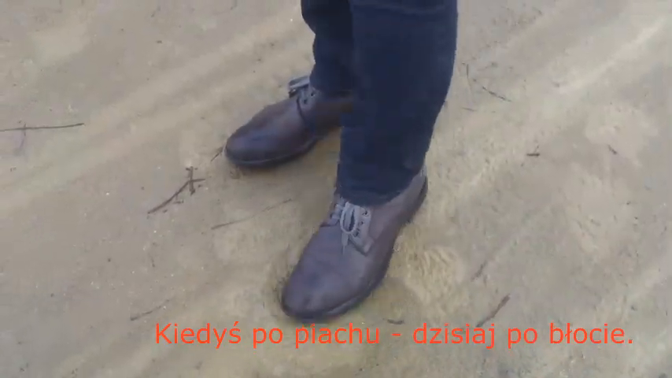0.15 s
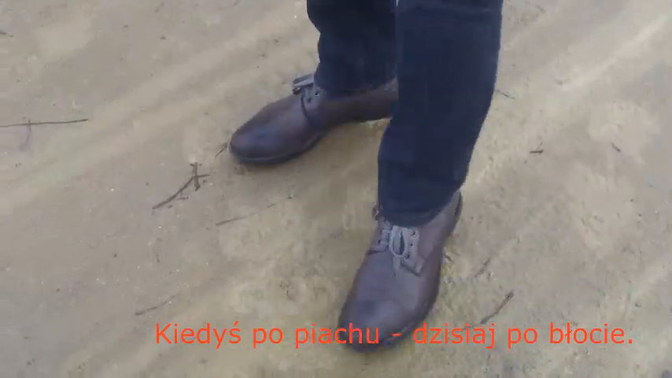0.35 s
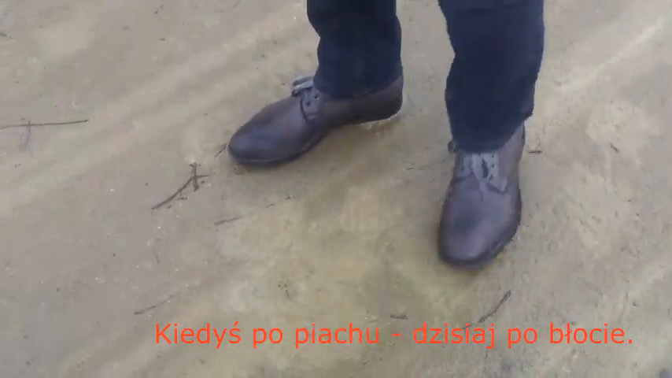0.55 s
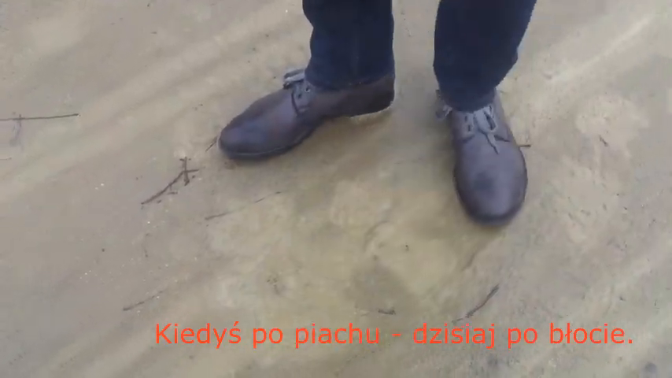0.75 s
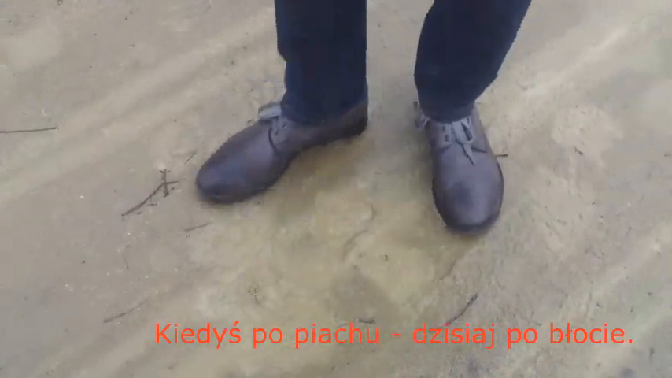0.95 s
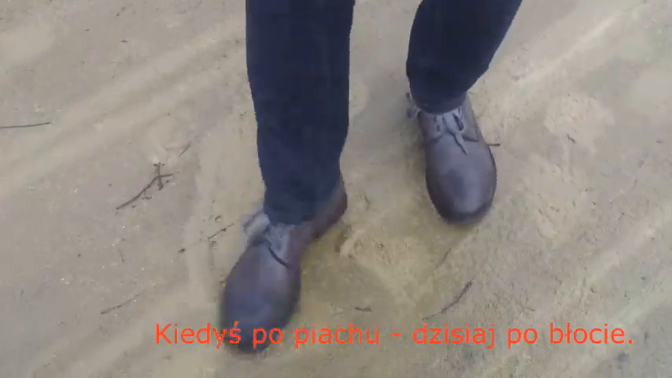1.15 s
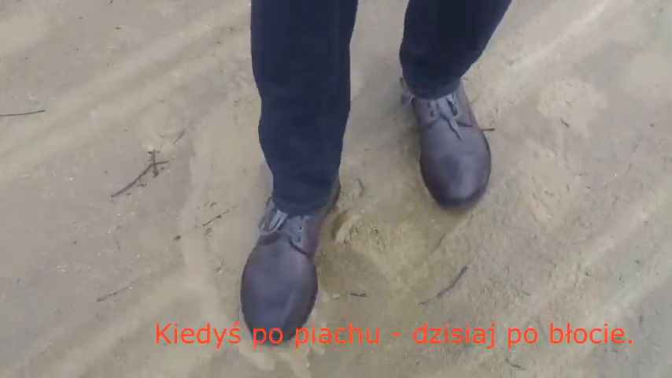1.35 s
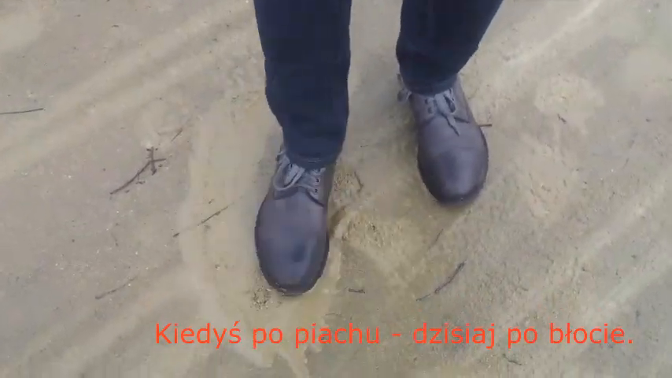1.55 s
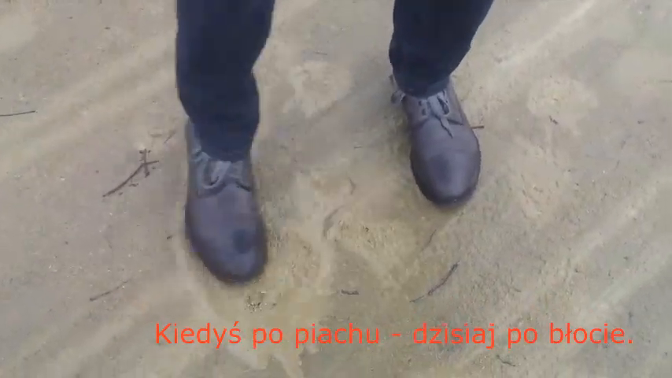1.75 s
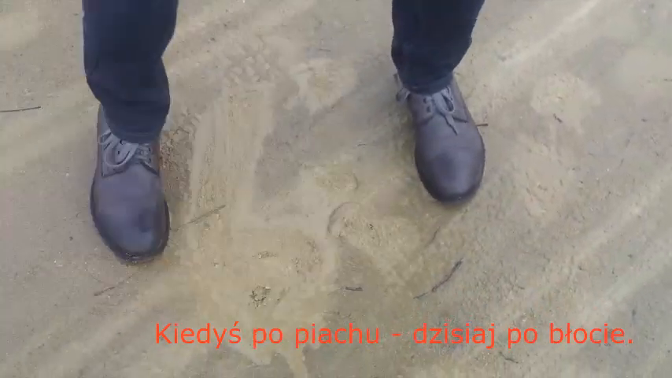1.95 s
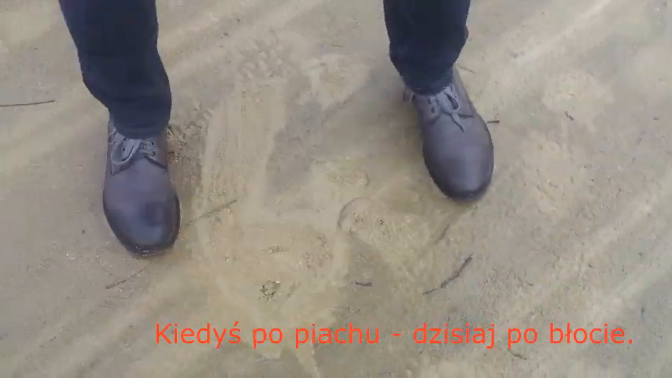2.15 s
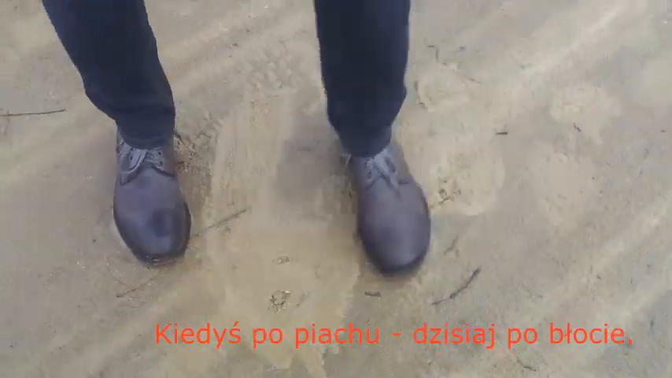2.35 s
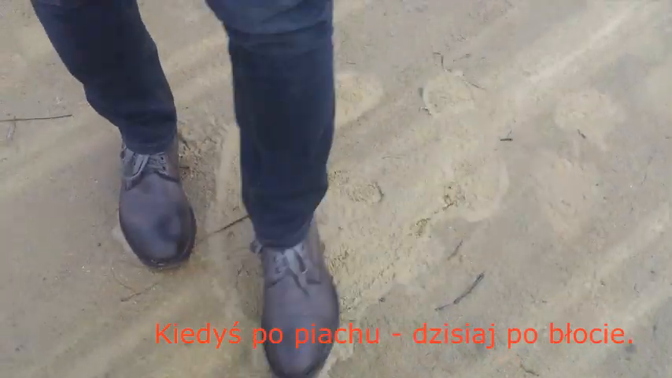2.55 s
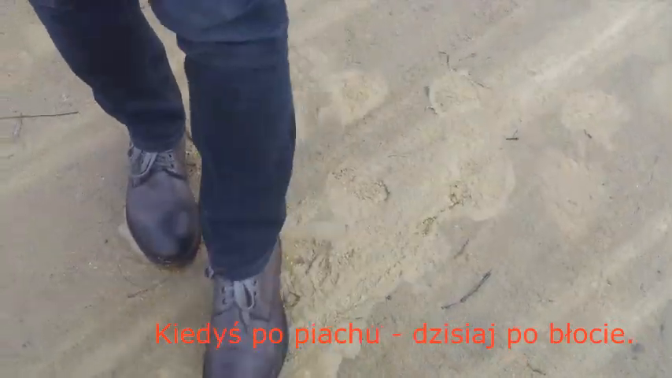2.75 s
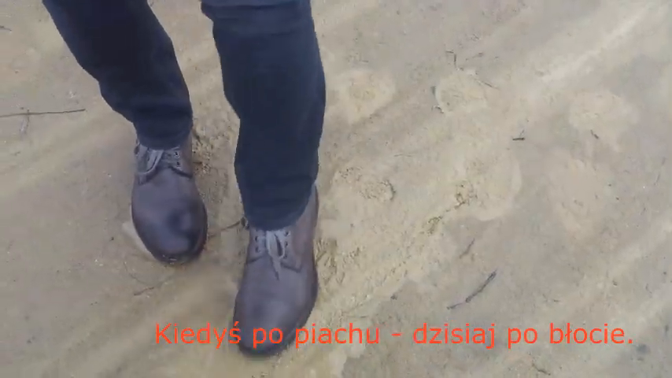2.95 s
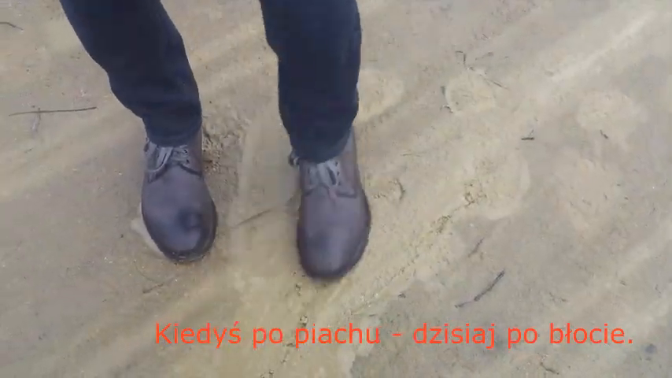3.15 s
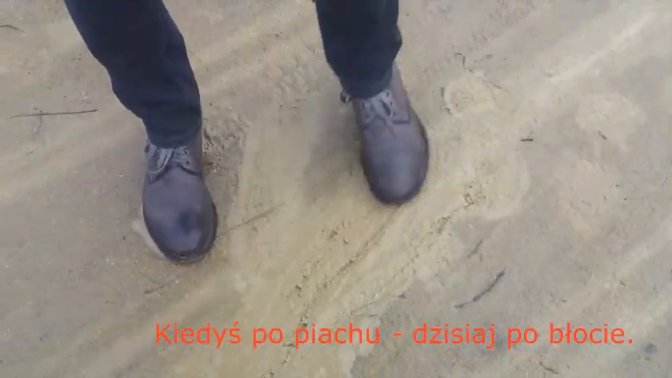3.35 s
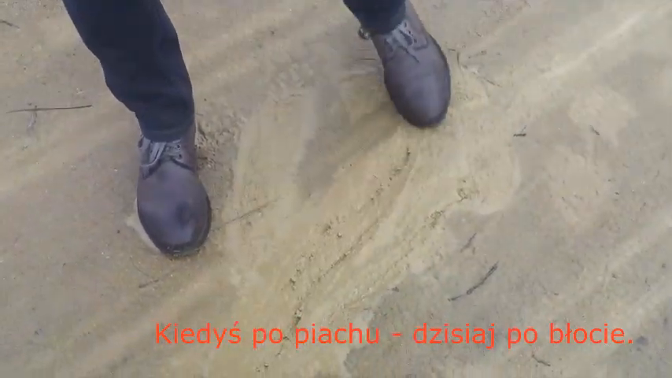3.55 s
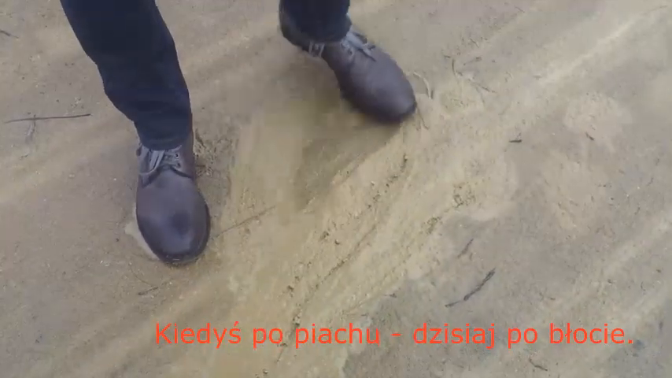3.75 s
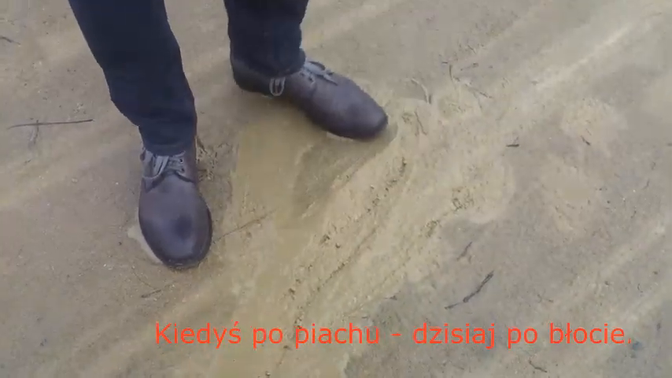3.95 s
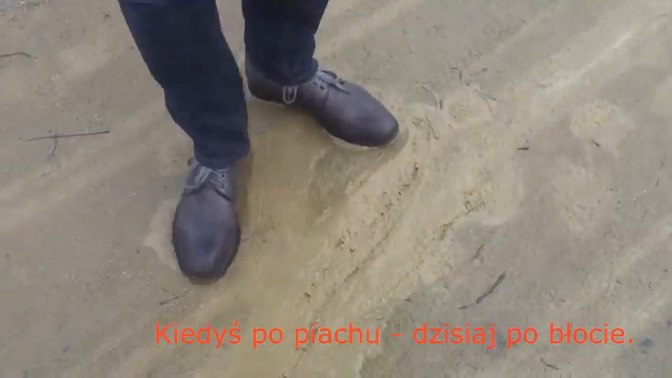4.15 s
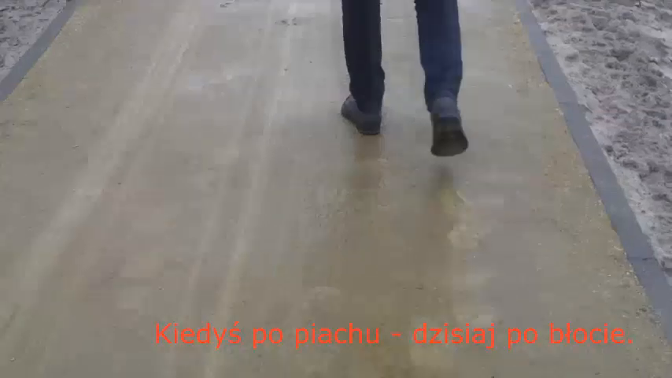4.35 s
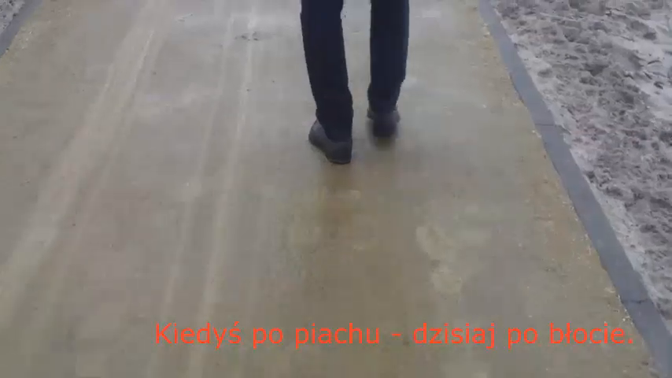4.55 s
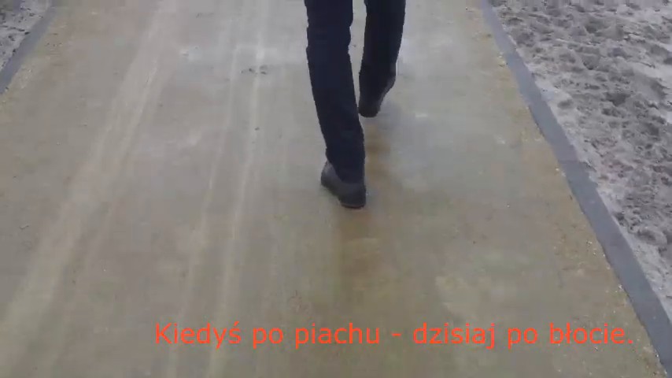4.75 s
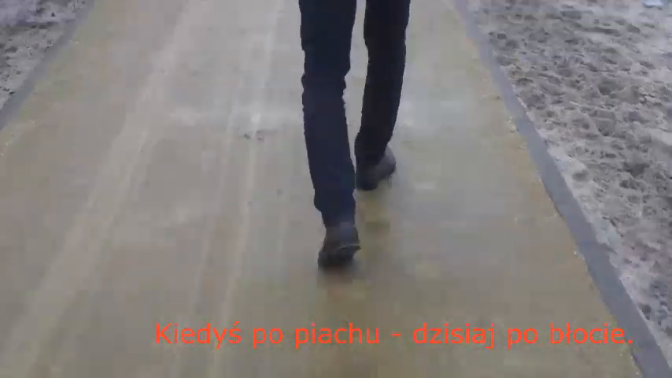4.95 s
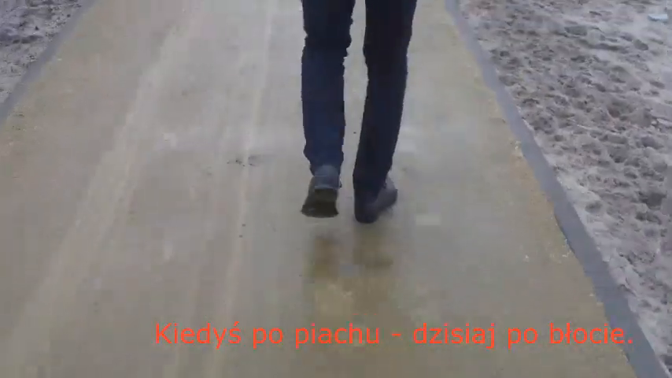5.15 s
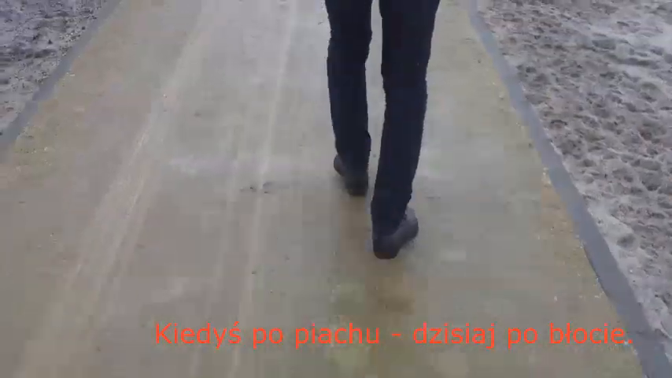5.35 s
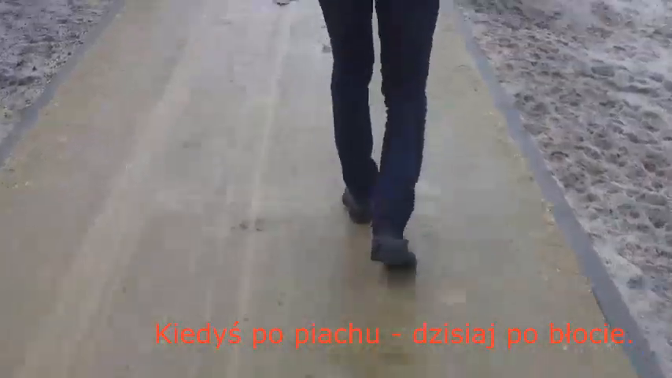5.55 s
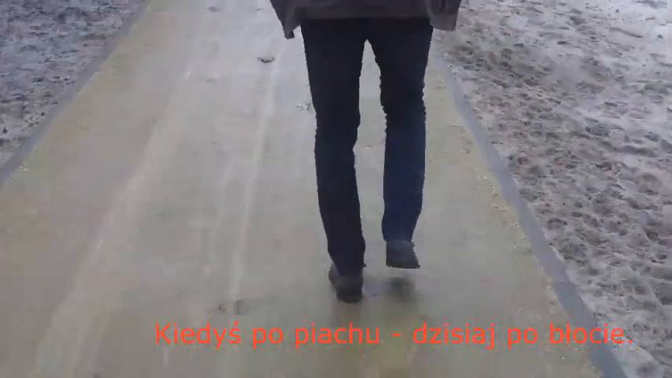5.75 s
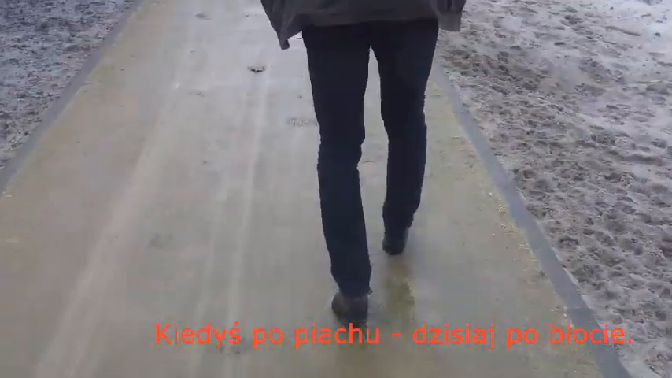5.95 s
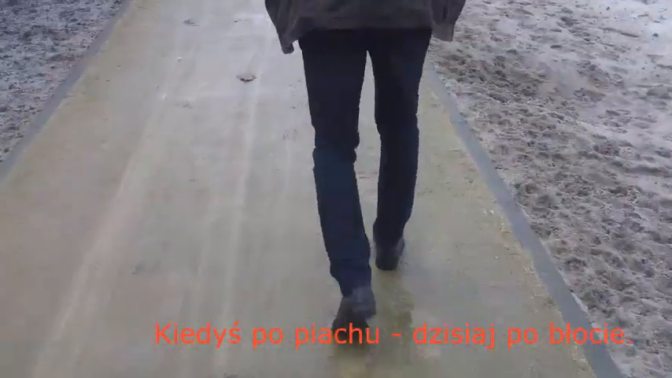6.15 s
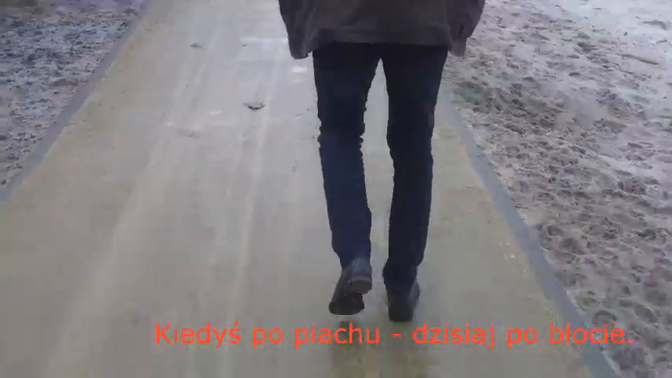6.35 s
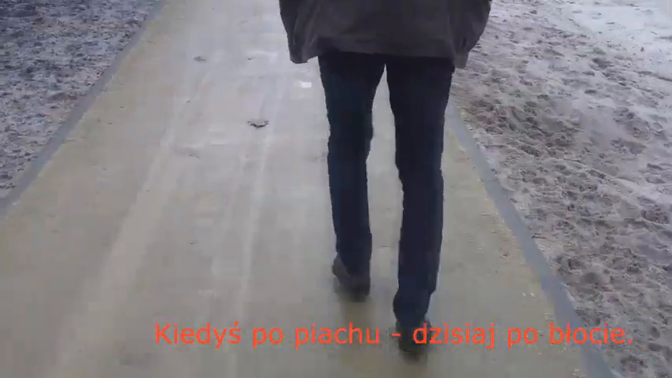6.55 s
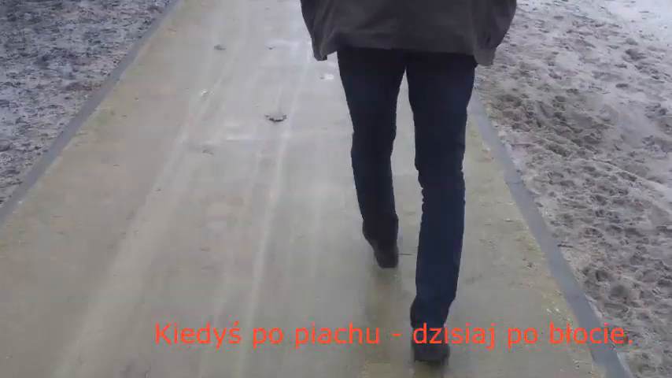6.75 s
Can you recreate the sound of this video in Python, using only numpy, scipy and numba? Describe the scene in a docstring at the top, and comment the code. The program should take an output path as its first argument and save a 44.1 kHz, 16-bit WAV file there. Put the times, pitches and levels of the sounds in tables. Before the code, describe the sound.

Shoes grind and squish in mud close up for four seconds, then faint, sticky steps continue over low rumble and steady hiss.

```python
"""Outdoors, on a wet sandy path: leather shoes scrape back and forth, then walk on with soft, sticky steps.
Scrapes and steps: random impulses (slipping grains) through fixed filters, plus ringing bubbles; in the
scrapes, moving resonances of the gap under the sole too. Ringing pops and dry sticky snaps are short rising
tones mixed with noise bursts. One heel thud is decaying noise. Behind lie steady coloured noise (rumble,
hiss) and a wavering low drone."""
import sys
import numpy as np
from scipy import signal
from scipy.fft import rfft, irfft, next_fast_len
from scipy.io import wavfile
from scipy.ndimage import map_coordinates
from numba import njit

SR = 44100
rng = np.random.default_rng(int(sys.argv[2]) if len(sys.argv) > 2 else 0)


def master(y):
    """Save y as 16-bit WAV."""
    cut = np.clip(np.atleast_2d(y).T, -1, 1)
    pcm = np.round(cut * 32767)  # scale
    wavfile.write(sys.argv[1], SR, pcm.astype(np.int16))


N = 304290


def amp(db):
    """Decibels to gain."""
    return 10 ** (np.asarray(db) / 20)


def unit(x):
    """Scale to rms 1."""
    return x / np.sqrt(np.mean(x ** 2) + 1e-20)


def along(points, hz):
    """Read (Hz, value) points on a log-frequency axis."""
    f, v = np.transpose(points)
    return np.interp(np.log(hz + 1), np.log(f + 1), v)


def wobble(rate_hz):
    """Smooth random curve through rate_hz random knots a second."""
    knots = rng.standard_normal(int(N * rate_hz / SR) + 4)
    return map_coordinates(knots, [np.arange(N) * rate_hz / SR])


def filtered(x, response):
    """Multiply the spectrum of x by a response of frequency."""
    m = next_fast_len(x.shape[-1] + 8192)
    return irfft(rfft(x, m) * response(np.fft.rfftfreq(m, 1 / SR)), m)[..., :x.shape[-1]]


def coloured(x, spectrum, size=2048):
    """Causal minimum-phase filter of the given spectrum; result has rms 1."""
    cepstrum = irfft(np.log(amp(along(spectrum, np.fft.rfftfreq(size, 1 / SR)))))
    # fold the cepstrum onto positive time
    cepstrum[1:size // 2] *= 2
    cepstrum[size // 2 + 1:] = 0
    impulse = irfft(np.exp(rfft(cepstrum)))
    return unit(signal.fftconvolve(x, impulse[None], axes=1)[:, :x.shape[1]])


def resonance(f, hz, width_hz):
    """Response of one damped mode."""
    return 1j * f * width_hz / (hz * hz - f * f + 1j * f * width_hz)


@njit
def swept(x, step, damping):
    """Resonator with moving pitch (step in radians per sample)."""
    out = np.zeros_like(x)
    for c in range(len(x)):
        state = 0j
        for i in range(x.shape[1]):
            state = state * np.exp(step[i] * (1j - damping)) + x[c, i]
            out[c, i] = state.real
    return out


def ringing(x, hz, q):
    """Moving, slightly unsteady resonance applied twice for steep sides; result has rms 1."""
    step = 2 * np.pi * hz * (1 + .025 * wobble(50)) / SR
    once = swept(x, step, .5 / q)
    return unit(swept(once, step, .5 / q))


def slips(rate_hz, spread_db):
    """Sand grains let go at random moments: impulses of random size and sign, as mid and side."""
    size = amp(spread_db * np.clip(rng.standard_normal(N), -2.5, 2.5))
    return (rng.random(N) < rate_hz / SR) * size * rng.choice([-1, 1], (2, N))


def catches(rate_hz, depth_db):
    """The sole grips and lets go: a random gain of rms 1."""
    return unit(amp(depth_db * np.clip(wobble(rate_hz), -2, 2)))


def bubbles(pitch_hz, scatter, cycles, spread_db, count, size=500):
    """Tiny air pockets, each a short decaying sine near the current pitch; result has rms 1."""
    start = rng.integers(0, N - size, count)
    detune, loud, mid_way, side_way = np.clip(rng.standard_normal((count, 4)), -2, 2).T
    hz = pitch_hz[start] * np.exp(scatter * detune)
    turns = hz[:, None] * np.arange(size) / SR
    life = np.exp(-turns / cycles) * (1 - np.exp(-turns))
    ring = amp(spread_db * loud)[:, None] * np.sin(2 * np.pi * turns) * life
    where = (start[:, None] + np.arange(size)).ravel()
    pair = [np.bincount(where, (ring * np.sign(way)[:, None]).ravel(), N) for way in (mid_way, side_way)]
    return unit(np.array(pair))


SWING_DB = 19.5  # gained over a stroke's rise time, lost over its fall time


def pressure(rows):
    """Power 0-1 of each stroke over time: it swells, holds and dies away."""
    t = np.arange(N) / SR
    away = []
    for s, rise_s, hold_s, fall_s, *_ in rows:
        away.append(np.maximum(s - t, 0) / rise_s + np.maximum(t - s - hold_s, 0) / fall_s)
    return amp(-SWING_DB * np.minimum(away, 5)) ** 2


def levels(rows, power):
    """Squelch, drag and grit of all strokes summed in power, in dB over time."""
    return 10 * np.log10(amp(np.array(rows)[:, 4:7].T) ** 2 @ power)


# Echoes off the other shoe and the legs. Each row: mean delay in seconds, level in dB.
LEG_ECHOES = [(.00113, -17.5), (.0037, -15)]


def between_legs(x):
    """Short echoes comb the sound; their paths drift as the feet move."""
    n = np.arange(N)
    out = x.copy()
    for delay_s, db in LEG_ECHOES:
        earlier = n - delay_s * SR * (1 + 0.051 * wobble(3))
        out += amp(db) * np.array([np.interp(earlier, n, channel) for channel in x])
    return out


# Still-air colour. Each row: frequency in Hz, relative density in dB per Hz.
AIR_COLOUR = [(12, -62), (20, -26.5), (33, -3.5), (59, -4), (154, -16), (192, -19), (274, -21),
              (351, -19.5), (517, -24), (1000, -25), (1430, -28), (9080, -34), (14500, -36.5)]
# Low drone. Each row: time in seconds, level in dB before the wavering and the output gain.
DRONE_LEVEL = [(0, -57), (2.4, -60.5), (4.2, -68), (4.33, -45), (4.52, -47.5), (4.62, -62), (5.05, -43),
               (5.45, -56), (5.65, -49), (6.3, -50), (6.5, -57)]


def outdoors():
    """Noise makes rumble and hiss; a sine of wavering pitch and level makes the narrow low drone."""
    air = amp(-49 + 0.25 * wobble(26)) * coloured(rng.standard_normal((2, N)), AIR_COLOUR)
    side_db = [(60, -8), (800, -2.5), (4000, 2.0), (12000, -0.5)]
    mid, side = filtered(air, lambda f: amp([0 * f, along(side_db, f)]))
    drone_s, level_db = np.transpose(DRONE_LEVEL)
    drone_db = np.interp(np.arange(N) / SR, drone_s, level_db)
    drone_hz = 48.5 + 2.58 * wobble(26)
    tone = np.sqrt(2) * np.sin(2 * np.pi * np.cumsum(drone_hz) / SR)
    drone = amp(drone_db + 3.2 * wobble(14)) * tone
    # a table of gains read by amp as dB: +0.4 dB left, -0.4 dB right
    return (np.array([mid + side, mid - side]) + drone) * amp([[.4], [-.4]])


# Heel landing. One row: start in seconds, level in dB before the mix, t60 in seconds.
HEEL_LANDING = (5.606, -36.5, 0.091)


def heel(size=12000):
    """A heel lands: low-coloured noise with a quick decay, a short dull thud."""
    s, db, t60_s = HEEL_LANDING
    t = np.arange(size) / SR
    colour = [(80, -21), (160, 2), (240, -3), (420, -1), (700, -14), (1500, -35)]
    thud = coloured(rng.standard_normal((2, size)), colour)
    out = np.zeros((2, N))
    out[:, round(s * SR):][:, :size] = amp(db - 60 * t / t60_s) * (1 - np.exp(-t / 0.0042)) * thud
    return out


# Soles rolling and peeling off. Each row: full pressure from in seconds, rise, hold and fall in seconds,
# squelch, sole drag and sand grit levels in dB before the mix.
STEPS = [ (4.63, 0.17, 0.24, .1, -53, -57.5, -51), (4.89, 0.016, 0.11, .1, -45, -50, -42.5),
         (5.045, 0.066, 0.019, 0.052, -39, -53, -37.5), (5.27, 0.32, 0.16, 0.23, -55, -57.5, -51),
         (5.41, .02, 0.021, 0.077, -46, -49.5, -45), (5.505, 0.072, 0.018, 0.17, -46.5, -53, -44),
         (5.618, 0.017, 0.009, 0.091, -41.5, -46, -45.5), (5.745, 0.13, 0.019, 0.069, -45.5, -55, -52),
         (5.93, 0.17, 0.17, 0.12, -60, -61, -59.5), (6.128, .08, 0.017, 0.086, -45.5, -62, -47),
         (6.175, .03, 0.026, 0.16, -50, -61, -45), (6.35, 0.094, 0.014, .08, -47.5, -55, -49),
         (6.44, 0.1, 0.015, .15, -45, -51.5, -46), (6.77, 0.22, 0.026, .15, -53.5, -60, -51),
         (6.868, .02, .03, .05, -48.5, -59, -50), ]
# Sole on the path. Each row: frequency in Hz, relative density in dB per Hz.
TREAD_COLOUR = [(60, -14), (105, -2), (160, -12), (240, -3), (330, -3.5), (450, 2.5), (750, -0.5),
                (1100, -2), (1500, -5), (2400, -39)]
# Wet sand under a step. Each row: frequency in Hz, relative density in dB per Hz.
WET_GRIT_COLOUR = [(2600, -28), (3700, 0), (4500, 1), (5100, -4), (5800, 3.5), (7200, -4.5), (9000, -9),
                   (12000, -14.5), (14500, -22)]


def walking():
    """Each step presses and peels a thin wet film: a fine, soft crackle of slips and bubbles."""
    squelch_db, drag_db, grit_db = levels(STEPS, pressure(STEPS))
    peel_db = 1.35 * wobble(130)
    drag = amp(drag_db) * coloured(slips(rate_hz=2400, spread_db=8), TREAD_COLOUR)
    film_colour = [(800, -17.5), (1200, -5.5), (1700, -0.5), (2200, 1.5), (2800, -1.0), (3500, 0.5),
                   (4400, -18.5)]
    film = coloured(slips(rate_hz=2900, spread_db=4.0), film_colour)
    film += amp(-7.5) * bubbles(np.full(N, 2300), scatter=0.28, cycles=4.8, spread_db=1.5, count=1800)
    sand = coloured(slips(rate_hz=5600, spread_db=2.0), WET_GRIT_COLOUR)
    sand += amp(-4.0) * bubbles(np.full(N, 5500), scatter=0.225, cycles=10, spread_db=3.5, count=2400)
    return between_legs(drag + amp(squelch_db + peel_db) * film + amp(grit_db + peel_db) * sand)


POP_T60_S, POP_RISE_S = 0.018, 0.00078  # decay; time the film takes to tear open
# Ringing pops and dry sticky snaps. Each row: start in seconds, level in dB before the mix,
# initial pitch in Hz, smack and spray in dB relative to that level.
POPS_AND_SNAPS = [(0.1234, -26.5, 1830, -4, -12.5), (0.6541, -19, 6150, -15, -30),
                  (0.8725, -24.5, 1820, -15, -25), (1.112, -7, 2010, -30, -30),
                  (1.1214, -6.5, 5030, -23, -29), (1.1304, -1.5, 5540, -27, -21),
                  (1.1648, -14.5, 1450, -18, -28), (1.296, -27, 5300, -15, -30),
                  (1.3492, -12, 6000, -8, -30), (1.384, -5, 4940, -15, -40), (1.4218, -8, 2010, -21, -35),
                  (1.6756, -24, 2210, -6, -13), (1.756, -10.5, 6020, -28, -25),
                  (1.9074, -21, 4260, -20, -10.5), (1.954, -21, 4980, -16, -15),
                  (2.226, -12, 1130, -20, -37), (2.2924, -3, 5770, -19, -40), (2.3217, -10, 2020, -25, -35),
                  (2.3532, -11.5, 2860, -13, -19), (2.366, -5.5, 6680, -24, -17),
                  (2.5192, -10.5, 2400, -18, -30), (3.026, -9.5, 2460, -28, -10),
                  (3.0541, -5.5, 2340, -30, -32), (3.115, 1.5, 6430, -24, -24),
                  (3.1363, -6.5, 2220, -4.5, -15), (3.1789, -6.5, 6360, -13.5, -19),
                  (3.3176, -4, 6180, -32, -28), (3.351, -6.5, 5910, -16, -21), (3.4471, -15, 6130, -29, -9),
                  (3.527, -22.5, 4920, -27, -3), (3.712, -34, 7300, -15, -5),
                  (3.8368, -16, 1970, -9.5, -9.5), (3.8457, -21.5, 3950, -2.5, -10),
                  (3.9838, -22.5, 1380, -8, -4.5), (4.346, -25, 6480, -7, -6),
                  (4.8802, -25.5, 6020, -18, -5), (4.8997, -25, 5650, -17, -8),
                  (4.9345, -28.5, 4070, -3.5, -6), (4.977, -24.5, 6050, -15, -12),
                  (5.462, -27.5, 4780, -5, -1.5), (5.48, -27, 5450, -24, -7), (5.5314, -18, 5630, -8, -23),
                  (5.7461, -30, 1650, -4.5, -8), (6.2097, -20.5, 5740, -14.5, -25),
                  (6.3626, -30.5, 6350, -6, -24), (6.86, -33, 5970, -21, -3.5), (6.87, -27, 5870, -14, -15)]
# Modes of the gap under the sole. Each row: frequency in Hz, width in Hz, level in dB.
GAP_MODES = [(517, 140, -19), (2230, 1400, -6.5), (4240, 2600, -6.5), (6540, 910, -4.5)]


def gap_response(f):
    """Modes of the gap under the sole, summed with alternating sign."""
    return sum((-1) ** k * amp(db) * resonance(f, hz, width_hz) for k, (hz, width_hz, db) in enumerate(GAP_MODES))


def popping_and_snapping(size=3000):
    """A pocket pops or a sticky film snaps: a short rising tone with noise bursts (smack and spray)."""
    out, t = np.zeros((2, N + size)), np.arange(size) / SR
    life = amp(-60 * t / POP_T60_S) * (1 - np.exp(-t / POP_RISE_S))
    spray_colour = [(1000, -14), (4000, -11.5), (7500, 0.5), (10000, -9.0), (14000, -20.0)]
    for s, db, hz, smack_db, spray_db in POPS_AND_SNAPS:
        noise = rng.standard_normal((3, 2, size))
        # pitch climbs; narrow noise roughens the tone
        tone = np.sin(2 * np.pi * hz * t * (1 + 6 * t) + 2 * np.pi * rng.random((2, 1)))
        rough = unit(filtered(noise[0], lambda f: resonance(f, hz, 0.23 * hz) ** 2))
        ring = tone + amp(-7.5) * rough
        smack = filtered(noise[1], gap_response)
        spray = coloured(noise[2], spray_colour)
        for part, part_db in ((ring, -8.5), (smack, smack_db), (spray, spray_db)):
            pulse = unit(part * life) * np.sqrt(np.mean(life ** 2)) / life.max()
            out[:, round(s * SR):][:, :size] += amp(db + part_db) * pulse
    return out[:, :N]


# Mud film. Each row: frequency in Hz, relative density in dB per Hz.
FILM_COLOUR = [(700, -45), (1200, -3.5), (1700, -7.5), (2100, -2), (2550, -2.5), (3100, -2.5), (3600, -7),
               (4400, -40)]


def squelching(low_hz, planing, froth):
    """Squeezed mud film: planing rings the low resonance, digging gives plain slips; bubbles on top."""
    push = catches(rate_hz=180, depth_db=1.5) * coloured(slips(rate_hz=3000, spread_db=5), FILM_COLOUR)
    film = amp(-1.5) * np.sqrt(1 - planing) * coloured(slips(rate_hz=2000, spread_db=4.0), FILM_COLOUR)
    film += amp(0.5) * np.sqrt(planing) * ringing(push, low_hz, q=5.4)
    film += amp(-8.5) * froth * bubbles(low_hz, scatter=0.221, cycles=8.7, spread_db=-1.5, count=1600)
    return film


FIZZ_DB, FILM_MUFFLES_DB = -10.5, 20  # spray relative to grit; its loss at full planing
# Sand grit. Each row: frequency in Hz, relative density in dB per Hz.
GRIT_COLOUR = [(2600, -29), (3300, -8), (3850, -3.5), (4400, -2.5), (4800, -6.5), (5350, -3), (5750, -1.5),
               (6400, 0), (7100, -0.5), (7900, -10), (8800, -9), (11000, -20.5), (12300, -48), (14500, -57)]
# Fine wet-sand spray. Each row: frequency in Hz, relative density in dB per Hz.
FIZZ_COLOUR = [(5500, -35), (7600, -3), (8600, 4), (10500, -3.5), (12200, -11.5), (14500, -35)]


def grinding(high_hz, planing, froth):
    """Slipping grains crunch, ring the high resonance, bubble and fizz; planing muffles the fizz."""
    push = catches(rate_hz=120, depth_db=4.0) * coloured(slips(rate_hz=3600, spread_db=-3.5), GRIT_COLOUR)
    sand = amp(-4.0) * coloured(slips(rate_hz=2500, spread_db=1.0), GRIT_COLOUR)
    sand += amp(-5.5) * ringing(push, high_hz, q=6.1)
    sand += amp(-7.5) * froth * bubbles(high_hz, scatter=0.1566, cycles=20, spread_db=4, count=2200)
    fizz = coloured(slips(rate_hz=2100, spread_db=0.5), FIZZ_COLOUR)
    return sand + amp(FIZZ_DB - FILM_MUFFLES_DB * planing) * fizz


GLIDE_S = 0.062  # low resonance glides this long either side of mid-hold


def gap_under_sole(rows, power):
    """Resonances and planing, weighted to the loudest stroke; the low one glides as the sole tilts."""
    s, _, hold_s, _, squelch_db, _, _, low_hz, glide_oct_per_s, high_hz, planing = np.transpose(rows)
    share = amp(squelch_db[:, None]) ** 2 * power
    share /= share.sum(axis=0)
    slid_s = np.clip(np.arange(N) / SR - (s + hold_s / 2)[:, None], -GLIDE_S, GLIDE_S)
    glide_oct = glide_oct_per_s @ (share * slid_s)
    return (low_hz @ share) * 2 ** glide_oct, high_hz @ share, planing @ share


# Soles sliding through mud. Each row: full pressure from in seconds, rise, hold and fall in seconds,
# squelch, sole drag and sand grit in dB before the mix, low resonance of the gap in Hz, its glide in
# octaves per second, high resonance in Hz, share of planing on the wet film (0-1).
SLIDES = [ (0.03, 0.097, 0.097, 0.054, -50.5, -59, -55, 2100, -0.5, 5470, 0.27),
          (0.121, 0.016, 0.017, 0.015, -36, -57, -32, 2110, -0.5, 5800, .3),
          (0.643, 0.0093, 0.033, 0.028, -40.5, -49.5, -35, 2760, 4.5, 6350, 0.53),
          (0.70, .05, 0.041, 0.14, -49, -55, -44.5, 1790, -0.5, 6430, 0.03),
          (0.91, 0.059, 0.16, .15, -33, -37.5, -28.5, 2110, 0.5, 4830, .3),
          (1.11, 0.2, 0.055, 0.058, -27.5, -38, -24, 2155, 0.5, 5330, .35),
          (1.28, 0.07, 0.058, .05, -46, -54.5, -49, 2450, 4, 5400, 0.7),
          (1.365, 0.056, 0.072, 0.042, -26.5, -39, -21, 2204, -5.5, 5240, 0.51),
          (1.685, 0.17, 0.058, 0.075, -37, -47.5, -37, 2030, -1, 5540, 0.5),
          (1.752, 0.075, 0.031, 0.026, -36, -46.5, -22.5, 2300, 1, 5630, 0.22),
          (1.918, 0.014, 0.025, 0.052, -38.5, -47, -35.5, 2170, 1, 5000, 0.34),
          (2.03, 0.28, 0.17, .1, -50, -54.5, -45, 2030, 1, 5340, 0.16),
          (2.212, 0.1, .02, 0.045, -37.5, -45, -39, 1290, -3.5, 6020, 0.2),
          (2.262, 0.045, 0.098, 0.046, -23, -33.5, -20.5, 2166, 2, 6300, 0.54),
          (2.39, .1, 0.1, 0.088, -33.5, -40.5, -28, 1990, 3.5, 5930, 0.5),
          (2.52, .05, 0.023, 0.038, -24.5, -39, -23.5, 2210, -8, 6190, 0.32),
          (2.595, 0.075, 0.032, 0.044, -27.5, -38.5, -29.5, 1730, -1.5, 6100, 0.1),
          (2.675, 0.083, 0.022, 0.039, -28, -41, -29, 2360, 3, 5830, 0.68),
          (2.785, 0.065, 0.0091, .08, -36.5, -53, -44, 2380, -2, 5900, 0.7),
          (2.84, 0.071, .04, 0.09, -36.5, -45, -36, 1940, 1, 5700, 0),
          (2.905, .06, 0.049, .1, -30.5, -42.5, -41, 2450, 2.5, 5660, 0.5),
          (3.025, 0.22, 0.15, 0.066, -26.5, -41, -22, 2300, -1.5, 5930, 0.62),
          (3.21, 0.088, 0.069, .1, -30.5, -38, -23, 2260, 1.5, 5980, 0.25),
          (3.295, 0.047, 0.065, 0.15, -36.5, -39, -21.5, 2250, -1, 6330, 0.2),
          (3.445, 0.086, 0.017, 0.076, -38.5, -37, -24.5, 2160, -1, 6140, 0),
          (3.53, 0.087, 0.0066, 0.23, -44, -45.5, -35, 2060, -1, 5560, 0.01),
          (3.71, .04, 0.15, .1, -54.5, -62, -51, 2000, 0.5, 5300, 0),
          (3.85, .03, 0.041, 0.22, -48, -48.5, -42.5, 2000, -2, 5640, .1),
          (4.05, 0.065, 0.016, 0.07, -40, -50.5, -41, 1580, 3.5, 5970, 0.36),
          (4.18, 0.091, 0.088, 0.017, -29, -39.5, -30.5, 2145, -3, 5000, .15),
          (4.30, 0.034, .05, 0.1, -43.5, -53, -48, 2040, -5.5, 6000, 0.13), ]
# Sole rumble. Each row: frequency in Hz, relative density in dB per Hz.
DRAG_COLOUR = [(60, -44.5), (115, -1.5), (170, -2), (235, 1.5), (350, -9), (440, 0), (530, -2.5), (760, -5),
               (1100, -4.5), (1400, -9.5), (2200, -48)]


def scraping():
    """The sliding sole rumbles, squeezes the mud film and grinds sand, all in shared little jerks."""
    power = pressure(SLIDES)
    squelch_db, drag_db, grit_db = levels(SLIDES, power)
    low_hz, high_hz, planing = gap_under_sole(SLIDES, power)
    planing = np.clip(planing, 0, 1)
    jerk_db = 0.88 * wobble(70) + 0.85 * wobble(320)
    drag = amp(drag_db + .5 * jerk_db) * coloured(slips(rate_hz=2500, spread_db=5), DRAG_COLOUR)
    froth = amp(np.clip(0.18 * (grit_db + 40), -10, 0))  # bubbles fade where the grit is weak
    film = amp(squelch_db + jerk_db) * squelching(low_hz, planing, froth)
    sand = amp(grit_db + jerk_db) * grinding(high_hz, planing, froth)
    return between_legs(drag + film + sand)


# Likeness of the two microphone ports. Each row: frequency in Hz, correlation (clipped to -1..1).
PORT_LIKENESS = [(100, 1.3), (500, 0.72), (2100, 1), (3200, 0.83), (4400, 0.1), (6000, 1.04), (9000, 0.1),
                 (14000, .5)]
# Port balance. Each row: frequency in Hz, left minus right in dB.
PORT_BALANCE = [(60, 7), (220, 2.5), (600, 0.5), (1500, -2), (2100, 0), (2900, 3), (3800, -1.5),
                (4350, 1.5), (5100, 8), (6400, 9.5), (7800, 1.5), (9400, 8), (11000, 4.5), (12500, -1.5)]
# Port phase. Each row: frequency in Hz, lead of the left in radians.
PORT_LEAD = [(2500, 0.19), (3500, 2.1), (4300, 1), (5400, -1), (6400, -1.1), (7500, -2), (9000, 3),
             (13000, 0.9)]


def ports(pair):
    """Mid and side to left and right, with likeness, balance and phase set by frequency."""
    turn = lambda f: np.arccos(np.clip(along(PORT_LIKENESS, f), -1, 1)) / 2
    mid, side = filtered(pair, lambda f: np.array([np.ones_like(f), np.tan(turn(f))]))
    lean = lambda f: amp(np.outer([.5, -.5], along(PORT_BALANCE, f)))
    shift = lambda f: np.exp(np.outer([.5j, -.5j], along(PORT_LEAD, f)))
    both = np.array([mid + side, mid - side])
    return filtered(both, lambda f: shift(f) * lean(f) / np.mean(lean(f), axis=0))


def scene():
    """Open air, the walk shifted 1.2 dB to the right, and the scraping shoes in front of the ports."""
    steps = ports(walking() + heel()) * amp([[-.6], [.6]])
    return outdoors() + steps + ports(scraping() + popping_and_snapping())


TOP_HZ = 14650  # half gain here


def record(dry):
    """Clip at full scale, then cut steeply above the band limit."""
    return filtered(np.clip(dry, -1, 1), lambda f: 1 / (1 + (f / TOP_HZ) ** 120))


dry = scene()
out = record(dry)
master(out)
```